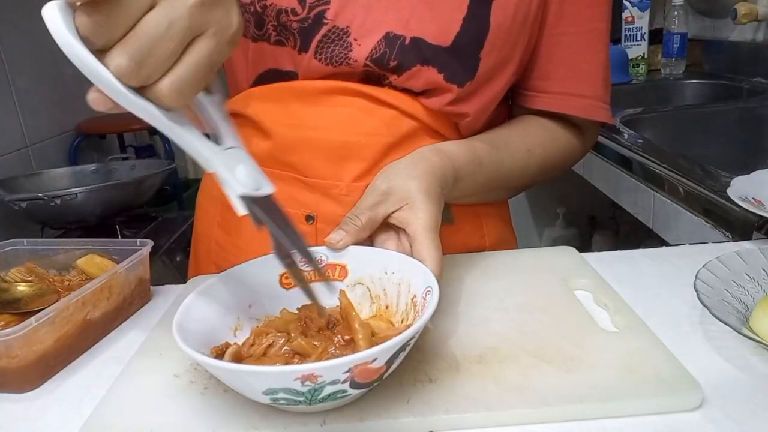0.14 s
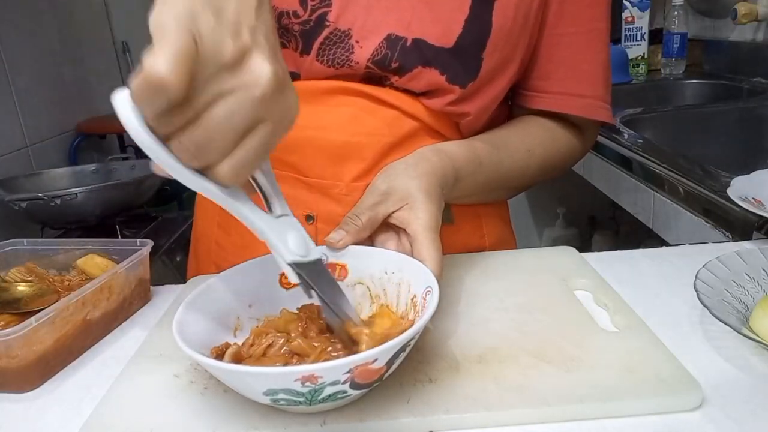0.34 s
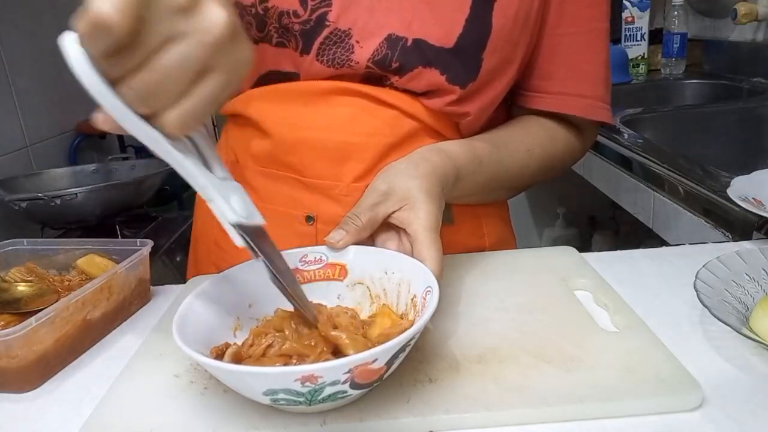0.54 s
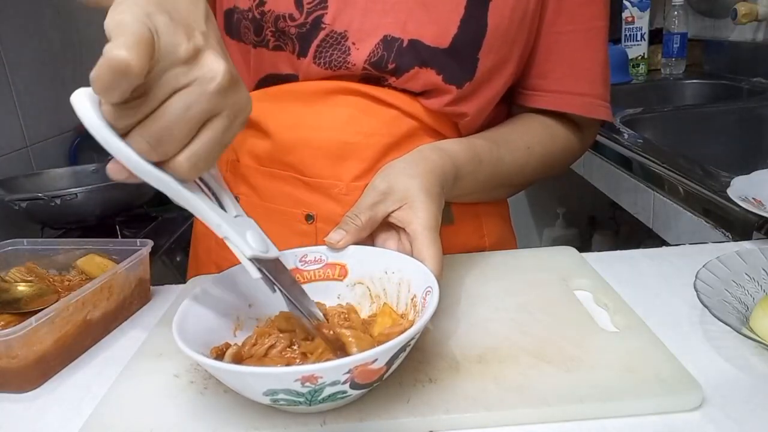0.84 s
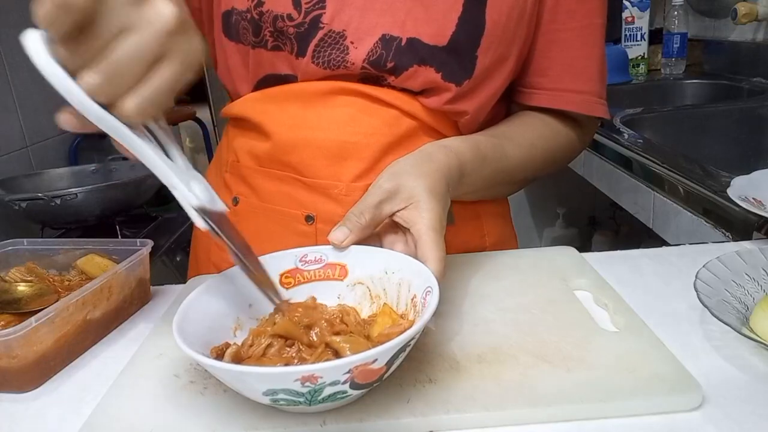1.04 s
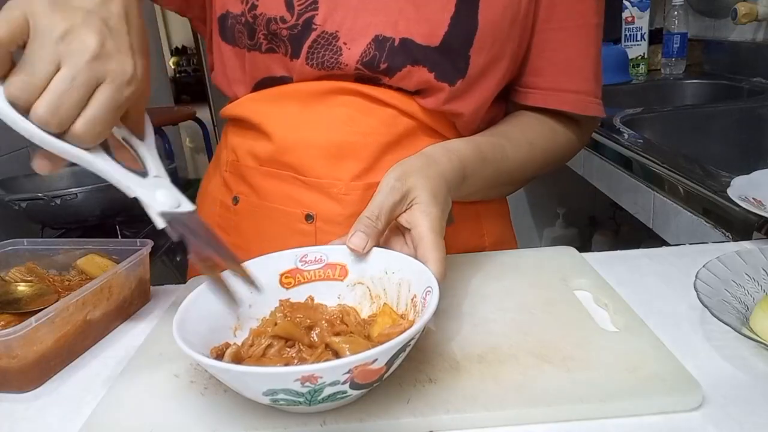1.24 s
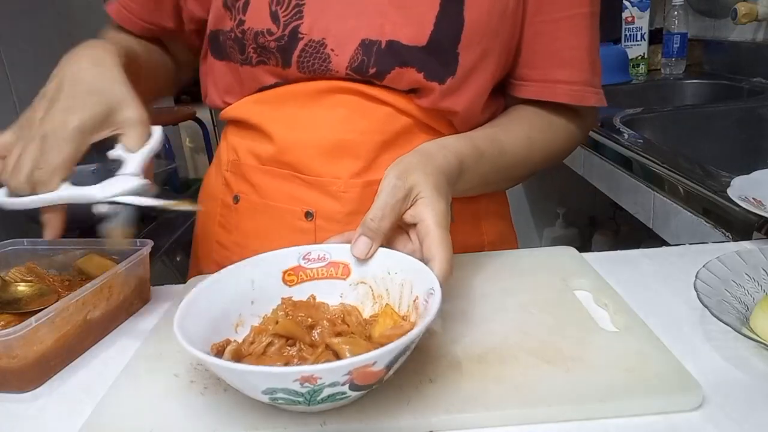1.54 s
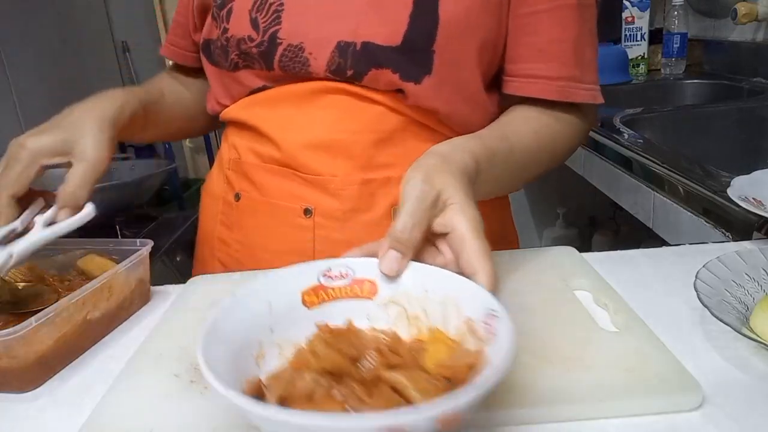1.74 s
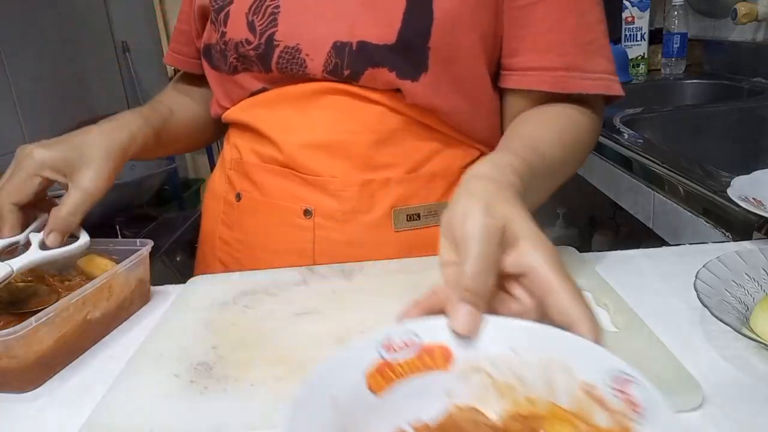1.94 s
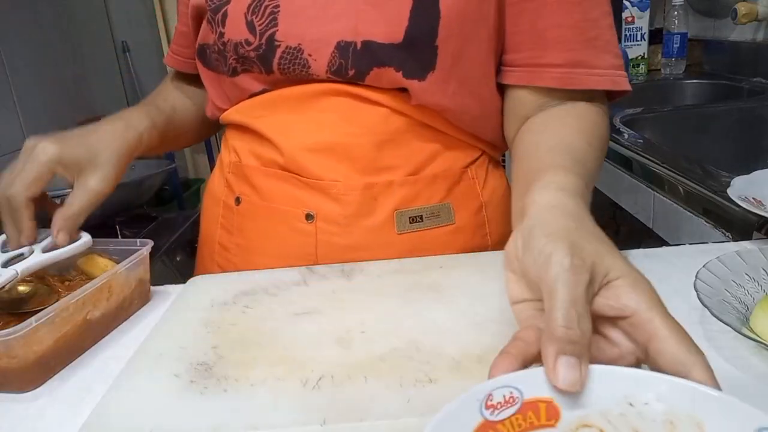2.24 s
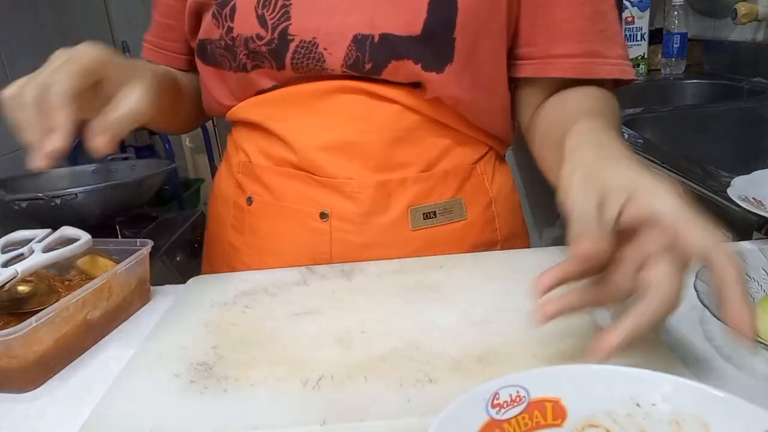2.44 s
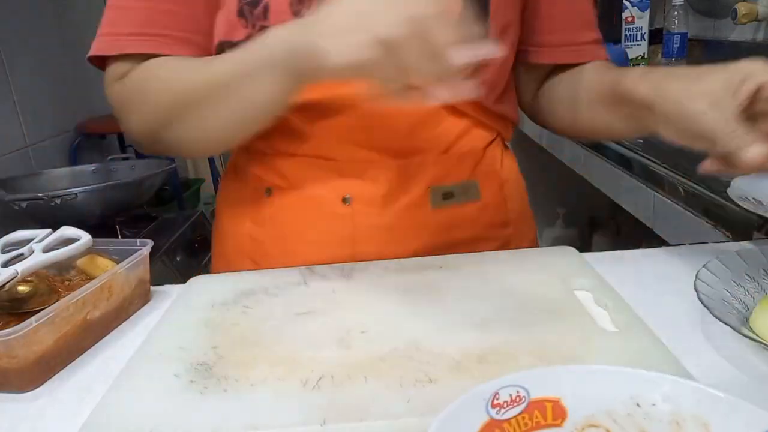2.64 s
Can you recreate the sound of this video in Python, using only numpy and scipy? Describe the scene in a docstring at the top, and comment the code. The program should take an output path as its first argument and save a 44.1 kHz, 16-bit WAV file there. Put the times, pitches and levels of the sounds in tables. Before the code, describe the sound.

Scissors crunch through wet cabbage, snap sharply twice, then clatter before a bowl settles on the counter

```python
"""In a small tiled kitchen, scissors cut kimchi in a bowl, over a faint low rumble.
The blades slide open in filtered noise with a faint squeak, and cut with crackling clicks and two crunches.
Empty, they clack shut: two loud snaps of noise with ringing steel, and fainter ones around them.
The scissors drop on a plastic tub; the bowl is set on the counter, knocking and ticking as it settles.
Knocks are clicks and chatter with dying tones; all but the rumble get dense, fading reflections."""
import sys
import numpy as np
from scipy import signal
from scipy.fft import rfft, irfft
from scipy.io import wavfile
from scipy.ndimage import uniform_filter1d

SR = 44100
rng = np.random.default_rng(int(sys.argv[2]) if len(sys.argv) > 2 else 0)


def unload_wav(signal):
    """Save mono or channel-first audio to the path in sys.argv[1] as 16-bit WAV at rate SR, clipped to [-1, 1]."""
    wavfile.write(
        sys.argv[1],
        SR,
        np.round(np.clip(np.atleast_2d(signal).T, -1, 1) * 32767).astype(np.int16),
    )


N = 123479  # length of the scene [samples]
HIT_S = 0.005  # length of the burst that defines the level of a blow [s]
EAR_GAP_S = 0.00055  # sound's travel time between the two ears [s]
EDGE_HZ = 16100  # upper edge of the sound [Hz]


def amp(db):
    """Turns decibels into gain."""
    return 10 ** (np.asarray(db) / 20)


def read(points, hz):
    """Reads a table between its points, along log frequency."""
    table_hz, value = np.transpose(points)
    return np.interp(np.log(hz + 1), np.log(table_hz), value)


def unit(x):
    """Scales a sound so that its channels have an average energy of one."""
    return x / np.sqrt(np.mean(np.sum(x ** 2, -1)) + 1e-20)


def add(mix, start_s, sound):
    """Mixes a sound in at a time, leaving out what falls outside the scene."""
    at = round(start_s * SR)
    sound = sound[..., max(-at, 0):]
    part = mix[:, max(at, 0):][:, :sound.shape[-1]]
    part += sound[..., :part.shape[1]]


def colour(x, points, tilt_db=0, knee_hz=700, size=4096):
    """Gives a sound a spectrum without pre-echo; above the knee it tilts by tilt_db per octave."""
    hz = abs(np.fft.fftfreq(size, 1 / SR))
    tilt = tilt_db * np.log2(np.maximum(hz, knee_hz) / SR)
    log_gain = np.log(amp(read(points, hz) + tilt))
    # minimum phase: the filter responds as early as it can
    spectrum = np.exp(np.conj(signal.hilbert(log_gain)))
    taps = np.fft.ifft(spectrum).real[:size // 2]
    return signal.fftconvolve(x, unit(taps)[None], axes=1)


def pair(count, same):
    """Makes noise for two ears; same is the share they have in common (0 to 1)."""
    shared, left, right = rng.standard_normal((3, count))
    same = np.clip(same, 0, 1)
    return np.sqrt(same) * shared + np.sqrt(1 - same) * np.array([left, right])


def grains(count, spread_db):
    """Makes dense tiny clicks of uneven size, with rms one."""
    noise = pair(count, 0.25)
    sizes = amp(spread_db * np.minimum(rng.exponential(1, count), 5))
    return unit(noise * sizes) * np.sqrt(count)


def patchy(x, depth_db):
    """Shifts the colour at random as the contact point travels along the wet blades."""
    z = signal.stft(x, nperseg=256)[2]
    field = rng.standard_normal(z.shape[1:])
    field = uniform_filter1d(field, size=5, axis=0)  # smooth over frequency
    field = uniform_filter1d(field, size=6, axis=1)  # smooth over time
    gain = amp(depth_db * (field / field.std() + 1.03))
    return signal.istft(z * gain, nperseg=256)[1]


def contact(scuff_s, click, same, rise_s=0.0004, size=4096):
    """Makes a sharp click plus chatter that dies with time constant scuff_s, even in spectrum."""
    t = np.arange(size) / SR
    envelope = np.exp(-t / scuff_s) * np.minimum(t / rise_s, 1) ** 2
    x = unit(pair(size, same) * envelope)
    x[:, 0] += click
    z = rfft(x, 2 * size)
    z /= np.sqrt(uniform_filter1d(abs(z) ** 2, size=80, axis=1))  # even out the spectrum
    return unit(irfft(z)[:, :size])


def ring(modes):
    """Adds up dying tones of a struck body, with new random phases each time."""
    t = np.arange(SR // 3) / SR
    # phases in turns, slightly different at the two ears
    turns = rng.random((len(modes), 1, 1)) + 0.067 * rng.random((len(modes), 2, 1))
    waves = 0
    for (hz, db, t60), turn in zip(modes, turns):
        waves = waves + amp(db - 60 * t / t60) * np.sin(2 * np.pi * (hz * t + turn))
    return unit(waves * np.minimum(t / 0.0011, 1))


def strike(db, sound):
    """Gives a blow the energy of a short burst at that level."""
    return amp(db) * np.sqrt(HIT_S * SR) * unit(sound)


# How long the room rings: (frequency [Hz], time to fall by 60 dB [s])
ROOM_FADE = [(100, .6), (250, 0.48), (700, .42), (2000, 0.43), (5000, 0.42), (10000, 0.37), (16000, 0.34)]


def kitchen(dry, wet_db, left_db, lag_ms, size=256):
    """Adds dense reflections from the tiles to a direct sound that reaches the right lag_ms later."""
    t = np.arange(SR // 2 + 8000) / SR
    echoes = rng.standard_normal((2, len(t)))
    echoes = echoes * (rng.random((2, len(t))) < 0.12)  # keep about one sample in eight
    hz, at, z = signal.stft(echoes, SR, nperseg=size)
    # the ears hear nearly the same bass but different treble
    same = np.sinc(2 * hz * EAR_GAP_S)[:, None]
    z[1] = same * z[0] + np.sqrt(1 - same ** 2) * z[1]
    z *= amp(-60 * at / read(ROOM_FADE, hz)[:, None])
    tail = signal.istft(z, SR, nperseg=size)[1][:, :len(t)]
    tail = tail * np.clip((t - 0.002) / 0.001, 0, 1)  # silent for the first 2 ms
    tail = tail * (1 + 0.89 * np.exp(-t / 0.025))  # stronger early reflections
    wet = signal.fftconvolve(dry, unit(tail), axes=1)[:, :N]
    khz = np.fft.rfftfreq(2 ** 17, 1000 / SR)
    late = irfft(rfft(dry[1], 2 ** 17) * np.exp(-2j * np.pi * khz * lag_ms))[:N]
    direct = np.array([dry[0], late])
    # left_db sets the left-right difference mainly in the treble
    treble = signal.lfilter(*signal.butter(1, 850, 'high', fs=SR), direct)
    side_gain = amp(np.array([[left_db], [-left_db]]) / 2)
    return direct + treble * (side_gain - 1) + amp(wet_db) * wet * amp([[0.5], [-0.5]])


# Level of the rumble, before its left-right balance: (time [s], level [dB])
RUMBLE_LEVEL = [(0, -65), (.3, -68.5), (.8, -66), (1.55, -70), (2.0, -61.5), (2.45, -63), (2.66, -72.5),
                (2.78, -66.5)]
# Colour of the rumble: (frequency [Hz], relative level [dB])
RUMBLE_COLOUR = [(20, -37.5), (45, -29), (75, -0.5), (100, 1), (140, -11.5), (205, -1.5), (330, -17),
                 (600, -26), (1500, -32.5), (5000, -36.5), (16000, -30.5)]
# Dull bumps of hand and counter, before a shared boost: (time [s], level [dB])
BUMP_HITS = [(0.149, -56.5), (0.591, -55.5), (1.225, -53.5), (1.423, -51), (1.87, -48), (2.231, -61)]
# Colour of the bumps: (frequency [Hz], relative level [dB])
BUMP_COLOUR = [(20, -30), (45, -15), (85, 2), (140, -11.5), (200, -11), (320, -21), (1000, -57)]


def rumble():
    """Low room noise drifts in level, with soft bumps of handling made of dying dull noise."""
    level_db = np.interp(np.arange(N) / SR, *np.transpose(RUMBLE_LEVEL))
    out = colour(pair(N, 0.9), RUMBLE_COLOUR)[:, :N] * amp(level_db)
    t = np.arange(SR // 2) / SR
    for start_s, db in BUMP_HITS:
        thud = pair(len(t), 0.91) * np.exp(-t / 0.11)
        add(out, start_s, strike(db + 8.0, colour(thud, BUMP_COLOUR)))
    return out * amp([[0.6], [-0.6]])  # slightly louder on the left


# Hard rim ticking against something, before the room: (time [s], level [dB])
RIM_TICKS = [(2.027, -56.5), (2.0738, -35), (2.157, -46), (2.2239, -21.5), (2.232, -27), (2.339, -38),
             (2.394, -44)]
# Colour of the ticks: (frequency [Hz], relative level [dB])
TICK_COLOUR = [(500, -7.5), (3500, -8.5), (4800, -11), (6000, -12.5), (8500, -1), (12000, -5), (14000, 0),
               (16000, -2)]


def ticking():
    """The rim ticks brightly, in short chatter, as the bowl is pushed into place."""
    out = np.zeros((2, N))
    for start_s, db in RIM_TICKS:
        tick = contact(scuff_s=0.0041, click=0.067, same=0.17)
        add(out, start_s, strike(db, colour(tick, TICK_COLOUR)))
    return kitchen(out, wet_db=-2.0, left_db=0.3, lag_ms=0)


# Bowl knocking on the counter, before the room:
# (time [s], level [dB], chatter decay [s], brightness [dB per octave])
BOWL_KNOCKS = [(2.0774, -14, 0.0036, 4.5), (2.1372, -17.5, 0.0031, 1), (2.1589, -18.5, 0.0022, 4),
               (2.1733, -23.5, .003, -2), (2.2276, -17.5, 0.0064, -.5), (2.2346, -17.5, .005, 2),
               (2.244, -24.5, 0.0035, -3.5), (2.269, -29, 0.0085, -1), (2.326, -34.5, 0.0054, -1.5),
               (2.334, -31, 0.0046, -4.5), (2.358, -31, 0.0059, -2.5), (2.388, -33.5, 0.019, -4)]
# Colour of the knocks before brightness: (frequency [Hz], relative level [dB])
KNOCK_COLOUR = [(60, -38.5), (130, -18), (230, -7.5), (320, -9.5), (400, -3), (550, -3), (750, -6.5),
                (1100, 4), (1550, -3), (2350, -11), (3100, -31.5), (6000, -46), (16000, -76.5)]
# Tones of the bowl with its food: (frequency [Hz], relative level [dB], time to fall by 60 dB [s])
BOWL_TONES = [(229, -10, 0.34), (551, -9, 0.12), (779, -7, 0.17), (1019, -3, .16), (1176, -3, 0.22),
              (1224, -3.5, .1), (1483, 4.5, 0.165), (1510, 6.5, .04), (1742, -4, 0.12)]


def bowl():
    """The foot of the bowl knocks, rocks and settles: short contacts are clean, long ones chatter."""
    out = np.zeros((2, N))
    for start_s, db, scuff_s, tilt_db in BOWL_KNOCKS:
        blow = contact(scuff_s, click=1.93 * np.exp(-scuff_s / 0.005), same=0.85)
        add(out, start_s, strike(db, colour(blow, KNOCK_COLOUR, tilt_db, knee_hz=151.2)))
        add(out, start_s, strike(db - 7.0, ring(BOWL_TONES)))
    return kitchen(out, wet_db=-4.5, left_db=8.5, lag_ms=0.13)


# Scissors landing on the tub, before the room: (time [s], level [dB], brightness [dB per octave])
TUB_HITS = [(1.793, -32, -2), (1.804, -20.5, 4), (1.836, -33.5, -3.5), (1.845, -27, 2)]
# Colour of the landings before brightness: (frequency [Hz], relative level [dB])
DROP_COLOUR = [(60, -31.5), (110, -16.5), (197, -7), (290, -13.5), (415, -6.5), (660, -15), (1870, -9.5),
               (3940, -26), (6300, -13.5), (10000, -14), (11900, -9.5), (16000, -18)]
# Tones of the plastic tub: (frequency [Hz], relative level [dB], time to fall by 60 dB [s])
TUB_TONES = [(194.8, 1, 0.33), (405, -4, .16), (582, -7, 0.088), (815, -9, 0.14)]


def dropping():
    """The scissors clatter on the rim of the tub, whose low tones boom a little at the first hit."""
    out = np.zeros((2, N))
    for start_s, db, tilt_db in TUB_HITS:
        clatter = contact(scuff_s=0.0045, click=0.56, same=0.7)
        add(out, start_s, strike(db, colour(clatter, DROP_COLOUR, tilt_db)))
    first_s = TUB_HITS[0][0]
    add(out, first_s, strike(-30, ring(TUB_TONES)))
    return kitchen(out, wet_db=-2.5, left_db=-1.0, lag_ms=-0.25)


# Blades snapping against their stop, before the room; the ring gets a further shared cut:
# (time [s], level [dB], brightness [dB per octave], ring against snap [dB])
BLADE_SNAPS = [(1.1124, -39.5, 13, -34), (1.2224, -21, 5, -6.5), (1.409, -14, 0, -2.5),
               (1.4319, -27.5, -8.5, 0), (1.7005, -35.5, 9.5, -20)]
# Colour of the snaps before brightness: (frequency [Hz], relative level [dB])
SNAP_COLOUR = [(60, -31.5), (200, -11), (310, -18.5), (500, -14.5), (750, -22), (1150, -12), (1800, -8),
               (2400, 4), (3100, -14), (4050, -3), (4900, -5.5), (5450, -18), (6200, 3), (7100, -12.5),
               (8500, -5), (10000, -10), (11100, -2.5), (12300, -5), (13300, -1), (16000, -13)]
# Tones of the steel blades: (frequency [Hz], relative level [dB], time to fall by 60 dB [s])
BLADE_TONES = [(518, -10, 0.097), (1110, -1, 0.25), (2180, -6.5, 0.2), (2427, 3, 0.18), (2467, 21.5, 0.098),
               (2690, -3.5, 0.24), (4190, 2, 0.18), (4950, -4, 0.31), (6120, 2, 0.08), (6130, 1.5, 0.14),
               (5960, 12, 0.023), (8460, -2.5, .18), (11140, 0, .24), (11160, 8.5, .14), (13260, 7, 0.069),
               (13400, 7, .13)]


def snapping():
    """The empty blades scrape shut in a few milliseconds, clack and ring."""
    out = np.zeros((2, N))
    for start_s, db, tilt_db, ring_db in BLADE_SNAPS:
        scrape = contact(scuff_s=0.0011, click=0, same=0.45, rise_s=0.0071)
        add(out, start_s, strike(db, colour(scrape, SNAP_COLOUR, tilt_db, knee_hz=4370)))
        add(out, start_s + 0.002, strike(db + ring_db - 5.5, ring(BLADE_TONES)))
    return kitchen(out, wet_db=-2.5, left_db=3.5, lag_ms=0.12)


# Blades sliding on each other, before patchiness, squeak and room:
# (time [s], length [s], level [dB], squeak pitch at the end [Hz])
BLADE_SLIDES = [(0.107, 0.093, -55.5, 8750), (.592, 0.087, -54, 8700), (0.806, 0.068, -59, 8600),
                (1.063, 0.11, -58.5, 8300)]
# Colour of the swish: (frequency [Hz], relative level [dB])
SLIDE_COLOUR = [(2500, -18), (4000, -17), (5200, -5.5), (7800, 3.5), (10000, -0.5), (16000, -4.5)]


def sliding():
    """Wet steel swishes on steel; a faint wavering squeak rises as the blades open."""
    out = np.zeros((2, N))
    for start_s, length_s, db, end_hz in BLADE_SLIDES:
        t = np.arange(int(length_s * SR)) / SR
        progress = t / length_s
        fade = np.clip(np.minimum(t / 0.016, (length_s - t) / 0.037), 0, 1)
        # the pitch starts 12 % lower
        turns = np.cumsum(end_hz * (1 - 0.12 * (1 - progress) ** 2)) / SR
        waver = signal.lfilter(*signal.butter(2, 200, fs=SR), pair(len(t), 0.5))
        squeak = amp(10.5) * progress * waver * np.sin(2 * np.pi * turns)
        swish = colour(grains(len(t), spread_db=4.0), SLIDE_COLOUR)
        swish = patchy(swish, depth_db=1)[:, :len(t)]
        add(out, start_s, amp(db) * fade * (swish + squeak))
    return kitchen(out, wet_db=-7, left_db=0.2, lag_ms=0.04)


# Blades working through cabbage, before colour, patchiness and room; a negative swell fades:
# (time [s], length [s], level aimed at by the end [dB], swell [dB])
CABBAGE_CUTS = [(-.06, 0.13, -68, -19), (0.327, 0.12, -42.5, 25.5), (0.869, 0.066, -44, 18.5)]
# Colour of the cutting: (frequency [Hz], relative level [dB])
CUT_COLOUR = [(200, -5.5), (500, -13.5), (1200, -30.5), (1900, -6.5), (2900, -8.5), (5400, -9), (11700, -2),
              (16000, -6)]
# The stalk gives way, before the room: (time [s], level [dB])
STALK_CRUNCHES = [(.439, -36.5), (0.916, -37)]
# Colour of the crunches: (frequency [Hz], relative level [dB])
CRUNCH_COLOUR = [(300, -26.5), (1200, -32.5), (2700, -0.5), (5000, -6), (9000, -2), (16000, 0)]
# Wet leaves squelch, before the room: (time [s], level [dB], pitch [Hz])
LEAF_SQUELCHES = [(.443, -46, 2930), (.539, -65, 4100), (0.846, -57.5, 3740), (.903, -51, 3660),
                  (1.015, -69.5, 810)]


def cutting():
    """Fibres crackle in tiny clicks, fading once, then swelling until stalks crunch; leaves squelch."""
    out = np.zeros((2, N))
    for start_s, length_s, db, swell_db in CABBAGE_CUTS:
        progress = np.linspace(0, 1, int(length_s * SR))
        fade = np.minimum(np.minimum(progress, 1 - progress) / 0.125, 1)
        level = amp(db - swell_db * (1 - progress) ** 1.3) * fade
        crackle = colour(grains(len(progress), spread_db=3.5) * level, CUT_COLOUR)
        add(out, start_s, patchy(crackle, depth_db=1.5))
    for start_s, db in STALK_CRUNCHES:
        crunch = contact(scuff_s=0.0067, click=0.47, same=0.93)
        add(out, start_s, strike(db, colour(crunch, CRUNCH_COLOUR)))
    t = np.arange(SR // 10) / SR
    for start_s, db, hz in LEAF_SQUELCHES:
        burst = grains(len(t), spread_db=3.5) * np.exp(-t / 0.006)
        squelch = signal.lfilter(*signal.iirpeak(hz, 4.5, SR), burst)
        add(out, start_s, strike(db, squelch))
    return kitchen(out, wet_db=-9.0, left_db=1.5, lag_ms=0.022)


def scene():
    """Adds up everything in the kitchen."""
    return cutting() + sliding() + snapping() + dropping() + bowl() + ticking() + rumble()


def record(dry):
    """Removes the highest treble with a steep low-pass filter."""
    taps = signal.firwin(255, EDGE_HZ, window=("kaiser", 9), fs=SR)
    return signal.oaconvolve(dry, taps[None], "same")


dry = scene()
out = record(dry)
unload_wav(out)
```